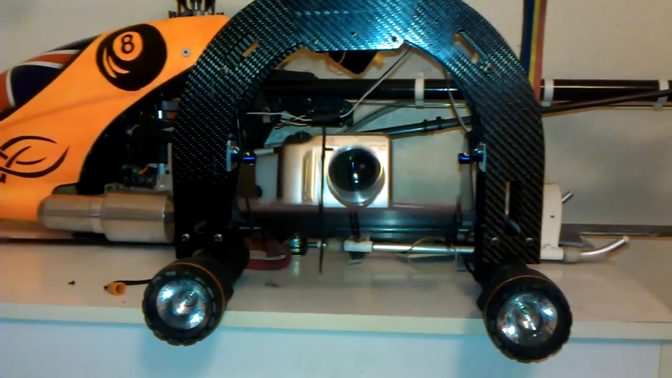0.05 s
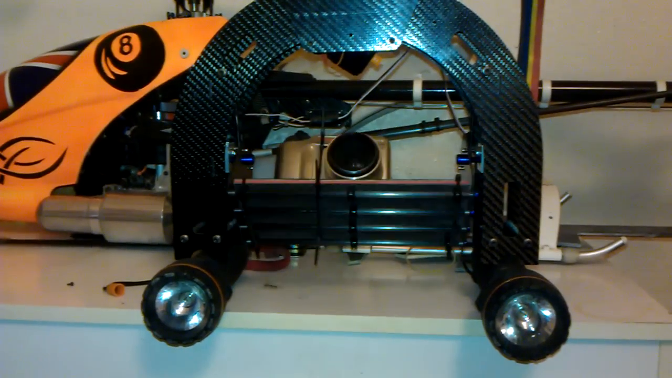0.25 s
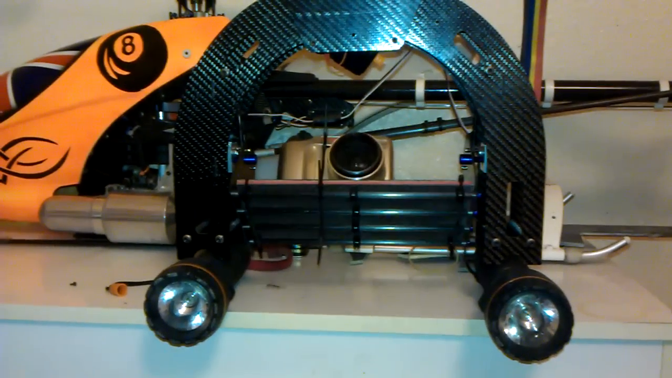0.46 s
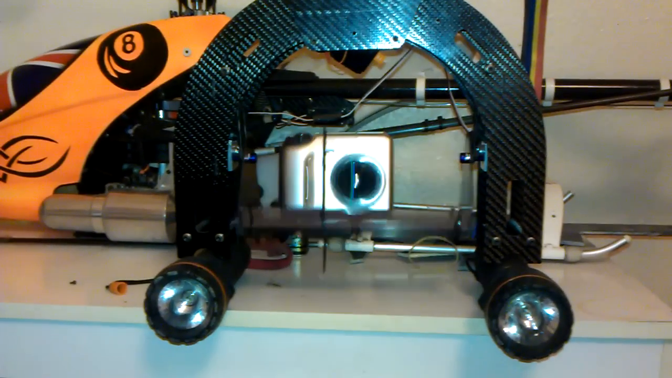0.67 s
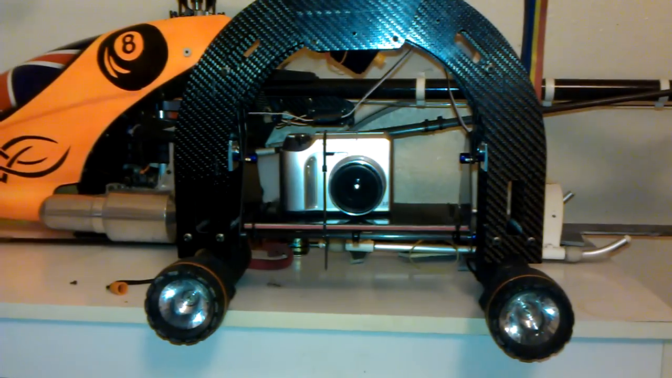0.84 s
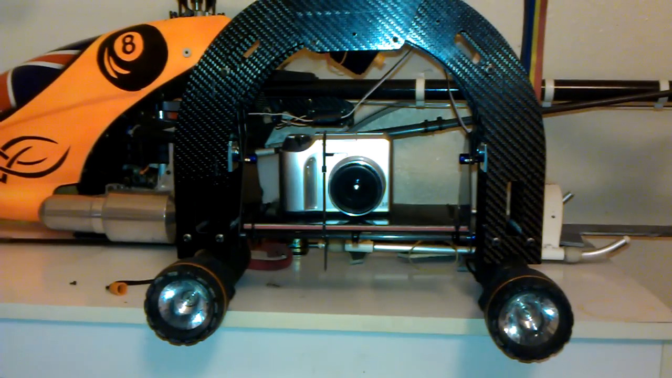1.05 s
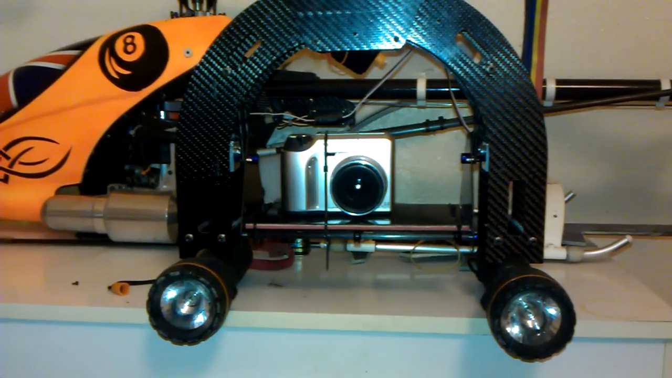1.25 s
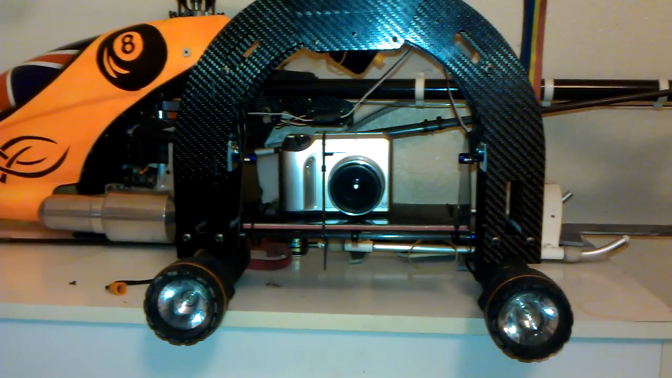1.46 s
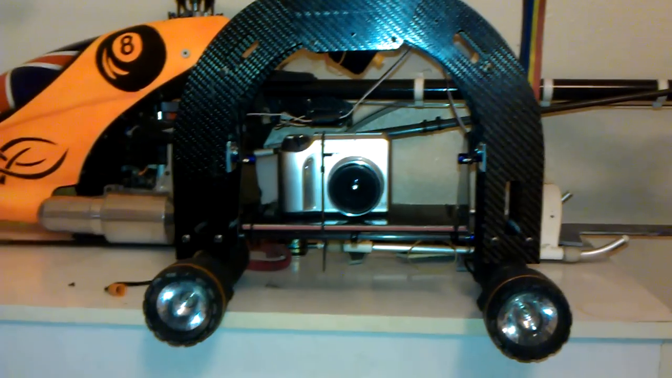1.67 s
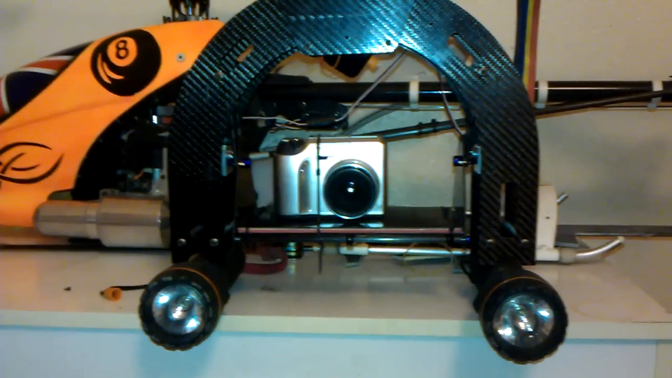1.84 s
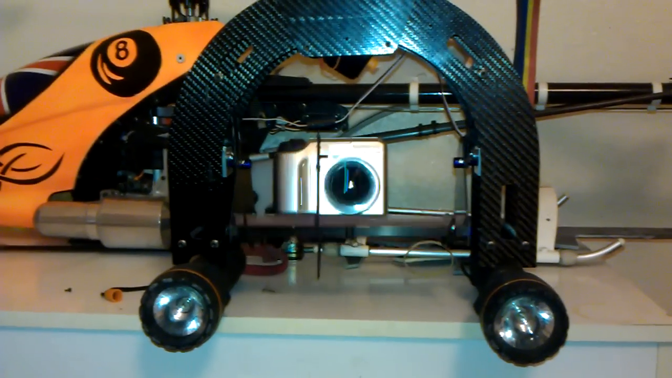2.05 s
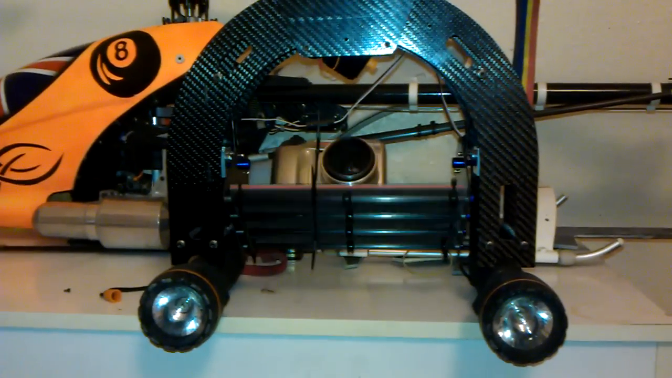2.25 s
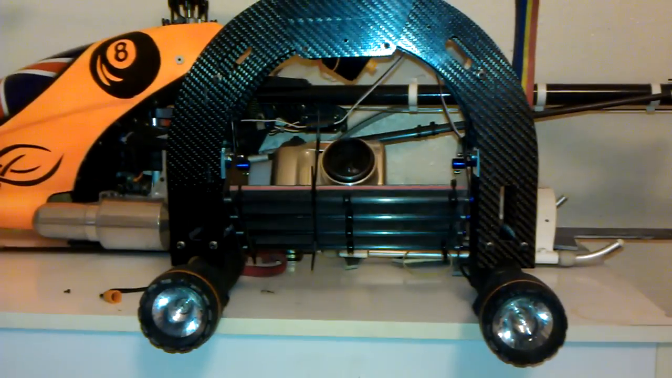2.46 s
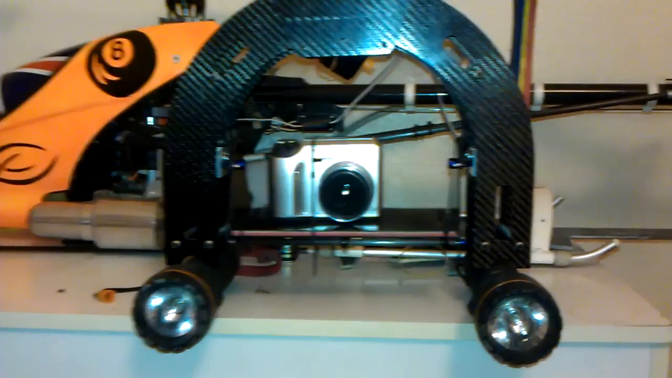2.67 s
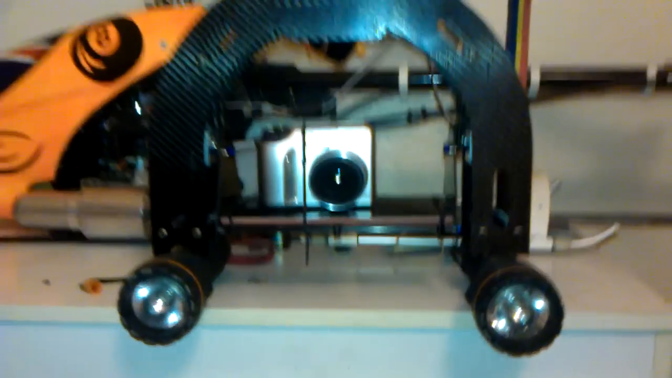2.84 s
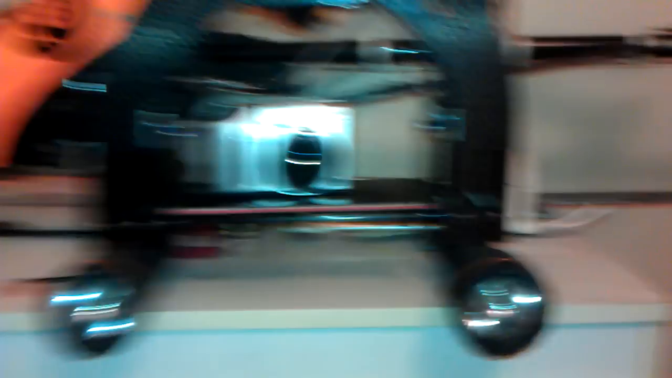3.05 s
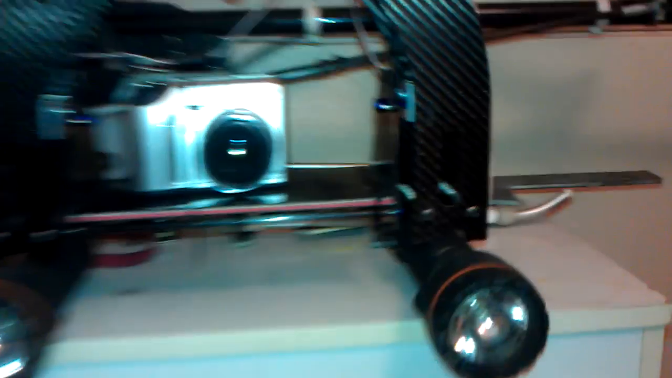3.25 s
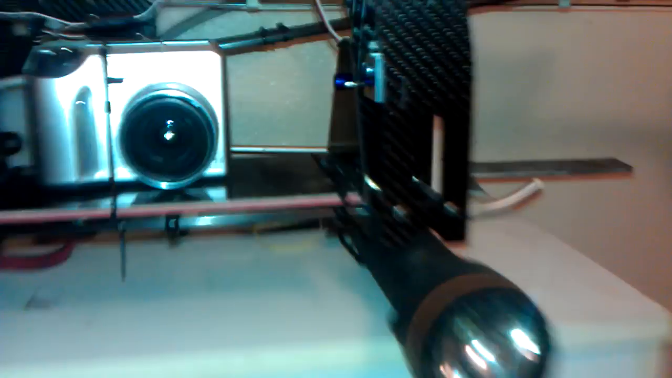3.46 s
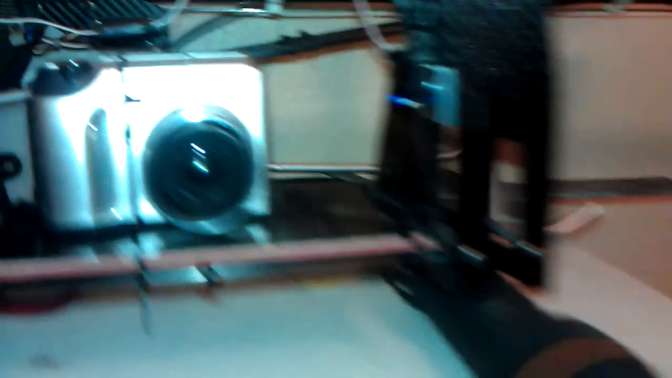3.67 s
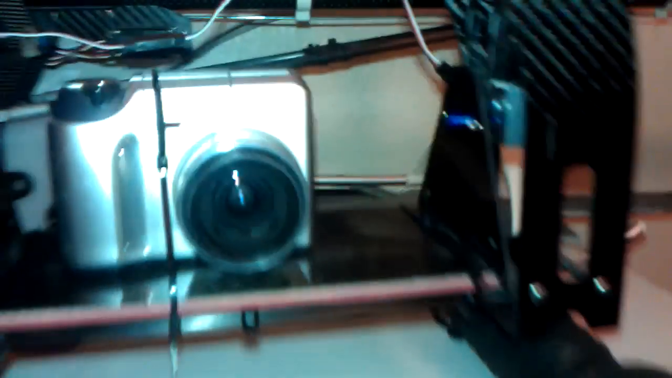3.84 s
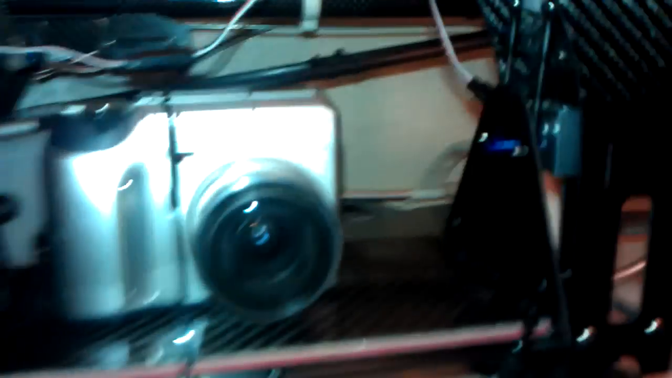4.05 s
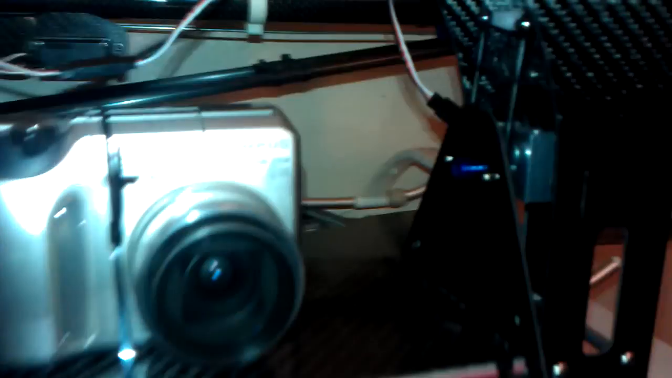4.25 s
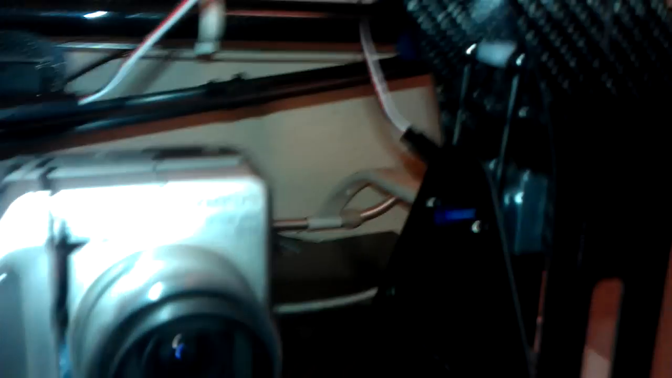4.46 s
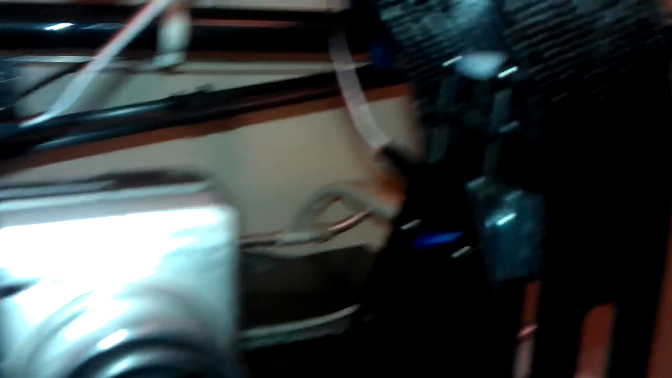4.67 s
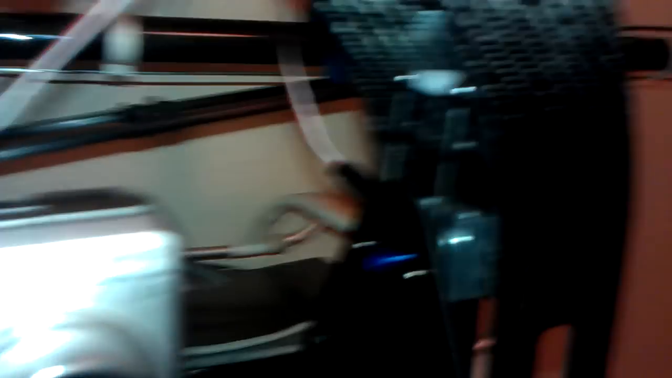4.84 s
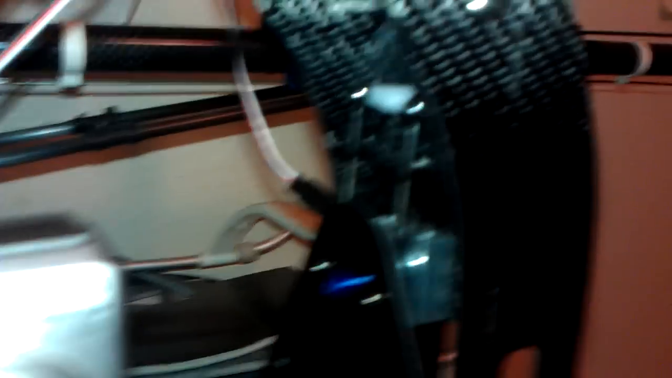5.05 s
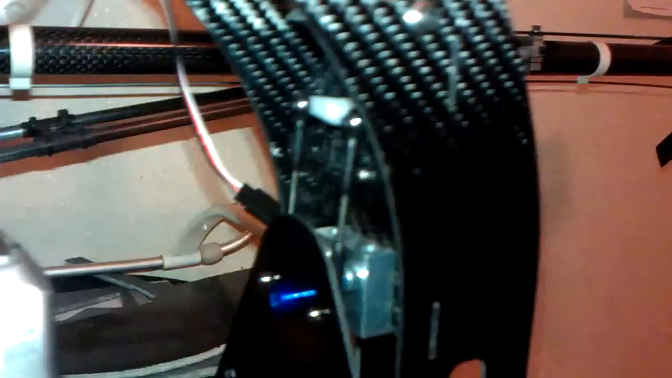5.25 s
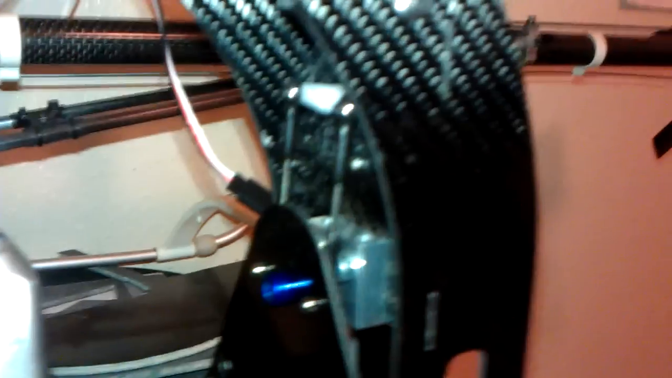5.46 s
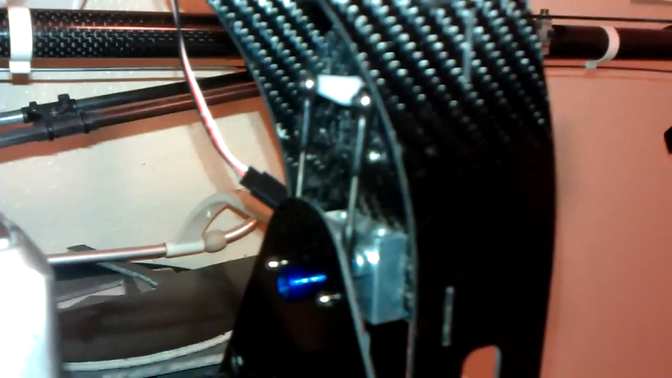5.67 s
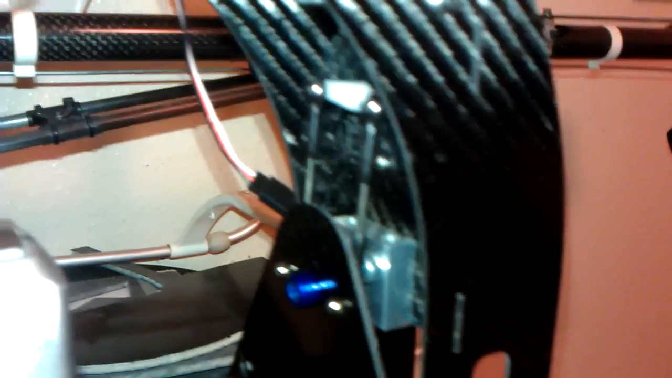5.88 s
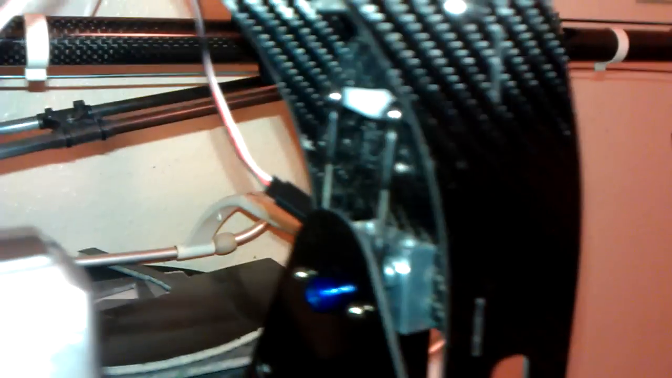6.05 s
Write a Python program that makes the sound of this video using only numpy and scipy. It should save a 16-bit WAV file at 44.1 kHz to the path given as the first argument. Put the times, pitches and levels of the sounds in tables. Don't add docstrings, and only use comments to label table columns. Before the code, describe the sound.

A small geared servo whines up and down twice in short gritty bursts, then a faint electric buzz grows closer amid knocks, handling ticks and hiss.

```python
import sys
import numpy as np
from scipy import signal
from scipy.fft import rfft, irfft, next_fast_len
from scipy.io import wavfile
from scipy.ndimage import uniform_filter1d

SR = 44100
rng = np.random.default_rng(int(sys.argv[2]) if len(sys.argv) > 2 else 0)


def waveform_to_disk(signal):
    frames = np.transpose(np.atleast_2d(signal))
    scaled = np.clip(frames, -1, 1) * 32767
    samples = np.round(scaled).astype(np.int16)
    wavfile.write(sys.argv[1], SR, samples)


def how_loud(loudness_db):
    steps = np.asarray(loudness_db, float) / 20
    return 10 ** steps


N = 269434

# [start t/s, spin-up t/s, top tooth contacts f/Hz, hunting share of speed,
# wheel turns to the first tight spot]
UP_STROKES = [
    (-.045, .135, 1850, .05, 0.15),
    (2.012, .13, 1850, 0.0052, 0.66),
]
DOWN_STROKES = [
    (.545, .147, 2953, 0.033, 0.33),
    (2.499, 0.12, 3039, .03, 0.33),
]
# [f/Hz, level per Hz/dB]
UP_TONE = [(530, -112), (900, -67), (1090, -35.5), (2250, -19), (3000, -23.5), (3500, -20), (4490, -9.5),
           (5180, -7.5), (6270, 0), (7410, -5), (9180, -12), (10200, -15.5), (15500, -31.5)]
DOWN_TONE = [(530, -70), (900, -27), (1160, -24.5), (1350, -36), (1750, -24.5), (2250, -16), (4770, -7),
             (6050, -10.5), (6580, 2), (8440, -5), (9860, -11.5), (12400, -22), (15500, -22.5)]
UP_OVERTONES = [-9, 0.5, -10, -6.5, -1]
DOWN_OVERTONES = [-15, 8.5, -1, 2.5, -5]
# [f/Hz, width f/Hz, lift level/dB]
GEARBOX_MODES = [(5320, 70, 4), (5840, 190, 4), (6050, 90, -12), (6530, 32, 3.5), (7210, 160, 1),
                 (7530, 95, 13), (8220, 270, 5), (8126, 85, 5.5), (9800, 28, -14), (10460, 98, 2)]
# [f/Hz, level per Hz/dB]
HISS_TONE = [(30, -13), (80, -4), (200, -0.5), (500, -2), (1000, -3.5), (1800, -8), (3000, -5), (6000, 0.5),
             (10000, -9.5), (15700, -12.5)]
# [f/Hz, rms level/dB]
FAN_TONES = [(457.6, -79.5), (909.8, -76)]
# [f/Hz, width f/Hz, level/dB]
FAR_MODES = [(2207, 7.6, -2), (2390, 13, -3), (2505, 16, -11), (3820, 440, 0), (4180, 180, 3.5),
             (4680, 330, -1), (5350, 83, -15), (6180, 160, -3), (7300, 166, 2), (8300, 580, -20),
             (10500, 490, -15), (13400, 1100, -36)]
# [f/Hz, width f/Hz, level/dB]
LAST_GEAR_MODES = [(6375, 76, 4), (6490, 280, -10)]
# [t/s, level/dB]
LAST_GEAR_LEVEL = [(0, -72.5), (.9, -67), (1.9, -63.5), (2.9, -66.5), (6.11, -68)]
# [f/Hz, width f/Hz, level/dB]
PLATE_MODES = [(2235, 70, 0), (2442, 35, -0.5), (2534, 24, 1.5), (2660, 7.9, 0), (3036, 18, -6.5),
               (3410, 29, -4)]
ARM_MODES = [(3660, 160, -15), (4125, 170, -3.5), (4540, 260, -3), (4990, 90, -4), (5340, 240, -19)]
CASE_MODES = [(6600, 330, -20), (6910, 370, -3.5), (7380, 560, 3), (7730, 530, 6), (8220, 600, -0.5),
              (9020, 340, -9.5)]
# [t/s, level/dB]
APPROACH = [(2.8, -63), (3.1, -62.5), (3.35, -60.5), (3.55, -60), (3.85, -56.5), (4.2, -57.5), (5.0, -55),
            (5.45, -56.5), (6.11, -56.5)]
# [middle t/s, length t/s, drop level/dB]
RESTS = [
    (3.23, .14, 12),
    (3.53, .015, 7),
    (3.975, .03, 18),
    (5.55, .065, 11),
    (5.74, .03, 5),
    (5.89, .03, 11),
]
# [t/s, thump level/dB, knock level/dB, snap level/dB]
KNOCKS = [
    (3.034, -52, -45, -33.5),
    (3.077, -47, -54, -57),
    (3.361, -50, -46.5, -46),
    (3.373, -48.5, -58, -42.5),
    (3.495, -45, -39.5, -31.5),
    (3.541, -46, -38, -34.5),
    (4.062, -76, -38.5, -42),
]
# [t/s, thump level/dB, knock level/dB, snap level/dB]
HAND_TICKS = [(4.218, -51, -50, -56), (4.315, -43, -46, -43), (4.341, -44, -45, -40),
              (4.367, -44.5, -52, -42), (4.487, -39.5, -36, -33), (4.507, -38.5, -41, -46),
              (4.544, -42, -41, -41), (4.74, -38, -42, -35), (4.836, -59, -54, -51),
              (4.875, -39.5, -48, -42), (4.91, -38.5, -47, -47), (4.975, -42.5, -56, -53),
              (5.299, -40.5, -40, -38.5), (5.521, -44, -58, -43)]

DRIVE_HZ = 300.75
PINION_TEETH, WHEEL_TEETH = 10, 52
TIGHT_DB, TIGHT_SCATTER_DB = 5, -1
TAKE_UP_S = 0.014
HUNT_S, JERK_S = 0.043, 0.013
CREEP = 0.57
ROOM_T60_S, ROOM_DB = 0.22, -7.5
KNOCK_T60_S, TICK_T60_S = 0.091, 0.013
AIR_DB, CARRY_S, CARRY_DB = -57.5, (2.3, 5.27), 3
FAN_FOLLOWS = 0.6
FAR_DB, RAISED_DB = -57.5, -3
ARM_DB, ARM_DB_PER_S = 0, 1.5
CASE_DB, CASE_DB_PER_S = 3.5, -0.5
SWING_MID_S = 4.6


def rms_one(x):
    return x / np.sqrt(np.mean(x ** 2) + 1e-20)


def curve(rows):
    s, value = np.transpose(rows)
    return np.interp(np.arange(N) / SR, s, value)


def drift(rate):
    r = np.exp(-2 * np.pi * rate / SR)
    walk = signal.lfilter([1], [1, -2 * r, r * r], rng.standard_normal(N + SR))
    return rms_one(walk[SR:])


def resonance(x, hz, width_hz):
    r = np.exp(-np.pi * width_hz / SR)
    poles = [1, -2 * r * np.cos(2 * np.pi * hz / SR), r * r]
    return signal.lfilter(np.array([1, 0, -1]) * (1 - r * r) / 2, poles, x)


def body(x, modes):
    rung = 0
    for k, (hz, width_hz, db) in enumerate(modes):
        rung = rung + (-1) ** k * how_loud(db) * resonance(x, hz, width_hz)
    return rms_one(rung)


def colour(x, spectrum):
    size = next_fast_len(N)
    hz, db = np.transpose(spectrum)
    at = np.log(np.fft.rfftfreq(size, 1 / SR) + 1)
    return irfft(rfft(x, size) * how_loud(np.interp(at, np.log(hz), db)), size)[:N]


def band(x, low_hz, high_hz):
    return signal.sosfilt(signal.butter(2, [low_hz, high_hz], "band", fs=SR, output="sos"), x)


def motion(rows, start_share, ease, settle_s, hold_s, sag, sag_power, top_db, jerk_db, take_up_db,
           rise, release_db_per_s):
    t = np.arange(N) / SR
    mesh_hz, level_db = np.full(N, 1000.), np.full(N, -120.)
    share, coast_s, tight_db = np.zeros((3, N))
    wear = rng.standard_normal((len(rows), 40))
    for (start, spin_s, top_hz, hunt, first), uneven in zip(rows, wear):
        on = (t >= start) & (t < start + 0.4)
        since = t[on] - start
        after = np.maximum(since - spin_s, 0)
        spun = np.sin(np.pi / 2 * np.minimum(since / spin_s, 1)) ** ease
        spun = start_share + (1 - start_share) * spun
        hunting = hunt * np.exp(-after / settle_s) * np.cos(2 * np.pi * (since - spin_s) / HUNT_S)
        braking_hz = top_hz * sag * (after / 0.1) ** sag_power
        hz = np.maximum(top_hz * spun * (1 + hunting) - braking_hz, top_hz * start_share)
        mesh_hz[on], share[on], coast_s[on] = hz, hz / top_hz, after

        attack_s = rise * spin_s
        attack_db = np.interp(since, [0, JERK_S, CREEP * attack_s, attack_s],
                              [jerk_db - 24, jerk_db, jerk_db + 6, 0])
        level_db[on] = top_db + attack_db - release_db_per_s * np.maximum(after - hold_s, 0)

        turns = np.cumsum(hz) / SR / WHEEL_TEETH - first + 0.5
        off_s = (turns % 1 - 0.5) * WHEEL_TEETH / hz
        spot_db = TIGHT_DB + TIGHT_SCATTER_DB * uneven[turns.astype(int)]
        spot_db = spot_db * spun ** 1.5 * np.exp(-0.5 * (off_s / 0.0027) ** 2)
        clack_db = take_up_db * np.exp(-0.5 * ((since - TAKE_UP_S) / 0.0045) ** 2)
        tight_db[on] = spot_db + clack_db
    return mesh_hz, share, coast_s, level_db, tight_db


def patchy_noise(patchy_db):
    edges, white = np.geomspace(900, 15500, 25), rng.standard_normal((2, N))
    patches = 0
    for k, (low, high) in enumerate(zip(edges, edges[1:])):
        patches = patches + band(white[k % 2], low, high) * how_loud(patchy_db * drift(35))
    return patches


def gearbox(x):
    return x + sum((how_loud(db) - 1) * resonance(x, hz, width_hz) for hz, width_hz, db in GEARBOX_MODES)


def strokes(moves, tone, overtones_db, clean_db, clean_slope_db, clean_cap_db, fade_db_per_s, wobble,
            runout, scatter_db, radiates_hz):
    mesh_hz, share, coast_s, level_db, tight_db = moves
    speed = uniform_filter1d(mesh_hz, size=500) * (1 + wobble * drift(100))
    turn = 2 * np.pi * np.cumsum(speed) / SR
    turn = turn + runout * np.sin(turn / PINION_TEETH)
    whine = 0
    for k, db in enumerate(overtones_db):
        whine = whine + np.cos((k + 1) * turn) * how_loud(db + scatter_db * drift(63))
    for _ in range(2):
        whine = band(whine, radiates_hz, 15000)
    whine_db = np.minimum(clean_db + clean_slope_db * (share - 1), clean_cap_db)
    whine_db = whine_db - fade_db_per_s * coast_s
    whine = gearbox(colour(0.66 * how_loud(whine_db) * rms_one(whine), tone))

    grains = patchy_noise(patchy_db=4.3) * how_loud(1.2 * drift(420))
    grind = gearbox(colour(rms_one(grains), tone))

    even = 1 / np.sqrt(uniform_filter1d((whine + grind) ** 2, size=2000) + 1e-20)
    tight = how_loud(tight_db)
    loaded = whine * tight + grind * tight ** 0.92
    return loaded * even * how_loud(level_db)


def strokes_up():
    rising = motion(UP_STROKES, start_share=0.51, ease=0.8, settle_s=0.12, hold_s=0.11, sag=0.25,
                    sag_power=2.1, top_db=-22.5, jerk_db=-12, take_up_db=-2.5, rise=0.59,
                    release_db_per_s=308)
    return strokes(rising, UP_TONE, UP_OVERTONES, clean_db=8, clean_slope_db=65, clean_cap_db=5,
                   fade_db_per_s=0, wobble=0.004, runout=0.14, scatter_db=4.5, radiates_hz=3090)


def strokes_down():
    falling = motion(DOWN_STROKES, start_share=0.35, ease=1.8, settle_s=0.039, hold_s=0.041, sag=0.02,
                     sag_power=1.1, top_db=-22, jerk_db=-18.5, take_up_db=8.5, rise=0.52,
                     release_db_per_s=257)
    return strokes(falling, DOWN_TONE, DOWN_OVERTONES, clean_db=11, clean_slope_db=70, clean_cap_db=0.5,
                   fade_db_per_s=40, wobble=0.004, runout=0.33, scatter_db=4.5, radiates_hz=4700)


def room(x):
    t = np.arange(int(0.6 * SR)) / SR
    tail = rng.standard_normal(len(t)) * how_loud(-60 * t / ROOM_T60_S) * (t > 0.004)
    tail = signal.lfilter([1], [1, -0.4], tail)
    return how_loud(ROOM_DB) * signal.fftconvolve(x, tail / np.sqrt(np.sum(tail ** 2)))[:N]


def background():
    t = np.arange(N) / SR
    carried = np.sin(np.pi * np.clip((t - CARRY_S[0]) / (CARRY_S[1] - CARRY_S[0]), 0, 1))
    hiss = rms_one(colour(rng.standard_normal(N), HISS_TONE)) * how_loud(AIR_DB + CARRY_DB * carried)
    fan = sum(how_loud(db + 2 + 0.8 * drift(2.2)) * np.sin(2 * np.pi * hz * t) for hz, db in FAN_TONES)
    return hiss + fan * how_loud(FAN_FOLLOWS * np.maximum(curve(APPROACH) + 68, 0) - 4)


def drive_pulses(steady, rattle, rattle_s, uneven_db=1.5, skipped=0.98):
    at = (np.arange(0.0012, N / SR, 1 / DRIVE_HZ) * SR).astype(int)
    kicks, strength = np.zeros((2, N))
    need, spread, way = rng.standard_normal((3, len(at)))
    fires = np.where(need > np.roll(need, 1), 1, skipped)
    strength[at] = fires * how_loud(uneven_db * spread)
    kicks[at] = steady + strength[at] * np.tanh(2 * way)
    shake = signal.lfilter([1], [1, -np.exp(-1 / (rattle_s * SR))], strength)
    return rms_one(kicks) + rattle * rms_one(shake * rng.standard_normal(N))


def holding_buzz():
    t = np.arange(N) / SR
    distant = drive_pulses(steady=1, rattle=1.17, rattle_s=0.014)
    raised = np.zeros(N)
    for up, down in zip(UP_STROKES, DOWN_STROKES):
        raised += (t > up[0]) * (t < down[0])
    raised = uniform_filter1d(raised, size=2000)
    far = how_loud(FAR_DB + RAISED_DB * raised) * body(distant, FAR_MODES)
    last_gear = how_loud(curve(LAST_GEAR_LEVEL)) * body(distant, LAST_GEAR_MODES)

    rest_db = sum(drop_db * np.exp(-(2 * (t - s) / length) ** 4) for s, length, drop_db in RESTS)
    effort = how_loud(curve(APPROACH) - rest_db)
    arm_db = ARM_DB + ARM_DB_PER_S * (t - SWING_MID_S)
    case_db = CASE_DB + CASE_DB_PER_S * (t - SWING_MID_S)
    plate = body(drive_pulses(steady=1, rattle=1, rattle_s=0.004), PLATE_MODES) * how_loud(1.23 * drift(13))
    arm = how_loud(arm_db) * body(drive_pulses(steady=1, rattle=1.14, rattle_s=0.0081), ARM_MODES)
    case_pulses = drive_pulses(steady=0.38, rattle=1.5, rattle_s=0.0022, uneven_db=0.6, skipped=0.7)
    case = how_loud(case_db) * body(case_pulses, CASE_MODES)
    return far + last_gear + effort * (plate + arm + case)


def hits(events, bands_hz, t60, click):
    out, t = np.zeros(N), np.arange(int(0.15 * SR)) / SR
    noise = rng.standard_normal((len(events), len(t)))
    for (s, *peaks_db), hiss in zip(events, noise):
        burst = hiss * how_loud(-60 * t / max(t60, 0.003)) + click * (t == 0)
        start = round(s * SR)
        for db, (low, high) in zip(peaks_db, bands_hz):
            part = band(burst, low, high)
            out[start:start + len(t)] += how_loud(db) * part / np.abs(part).max()
    return out


def room_knocks():
    return hits(KNOCKS, [(200, 1140), (1200, 3000), (5000, 8300)], KNOCK_T60_S, click=5)


def hand_ticks():
    return hits(HAND_TICKS, [(100, 1800), (1800, 7000), (8500, 12500)], TICK_T60_S, click=3.5)


def scene():
    bench = strokes_up() + strokes_down() + room_knocks()
    return (bench + room(bench) + hand_ticks() + holding_buzz() + background())[None]


def starve(x, under_db, scatter_db, top_holes):
    lead = 1024 - 547
    hz, _, frames = signal.stft(np.pad(x, (lead, 0)), SR, window="cosine", nperseg=2048)
    power = np.abs(frames) ** 2
    edges = np.unique(np.round(4 * 1.045 ** np.arange(122) / 4).astype(int) * 4) - 4
    luck = rng.standard_normal((len(edges), power.shape[1]))
    luck = rms_one(uniform_filter1d(luck, size=2, axis=1))
    for low, high, chance in zip(edges, edges[1:], luck):
        under = 10 * np.log10(power.sum(axis=0) / (power[low:high].mean(axis=0) + 1e-30))
        hole = (9500 < hz[low] < 15500) & (chance > top_holes) & (under > 36)
        limit_db = under_db - 3 * (hz[low] > 12800) + scatter_db * chance
        frames[low:high] *= (under < limit_db) & ~hole
    return signal.istft(frames, SR, window="cosine", nperseg=2048)[1][lead:lead + N]


def band_limit(x):
    return signal.sosfilt(signal.butter(12, 15750, fs=SR, output="sos"), x)


def record(dry):
    rounded = 0.56 * np.tanh(dry[0] / 0.55)
    mix = starve(rounded, under_db=53.5, scatter_db=3.5, top_holes=1.4)[None]
    return band_limit(mix)


dry = scene()
out = record(dry)
waveform_to_disk(out)
```